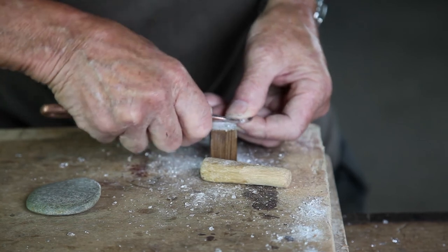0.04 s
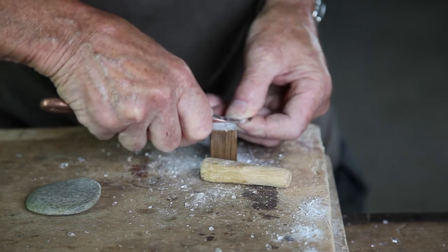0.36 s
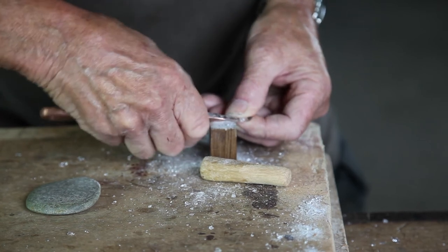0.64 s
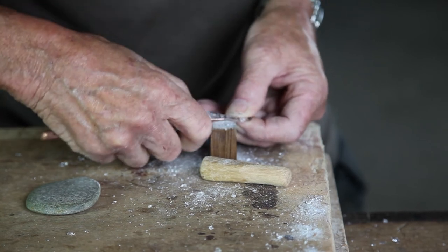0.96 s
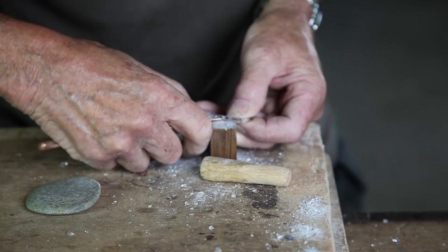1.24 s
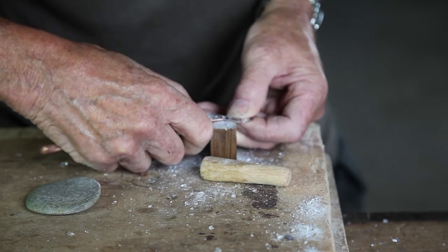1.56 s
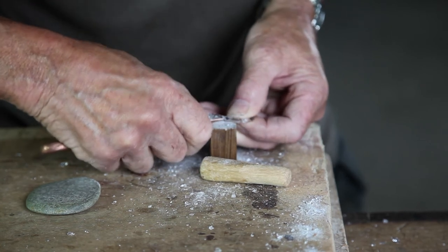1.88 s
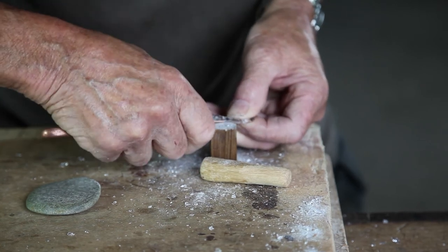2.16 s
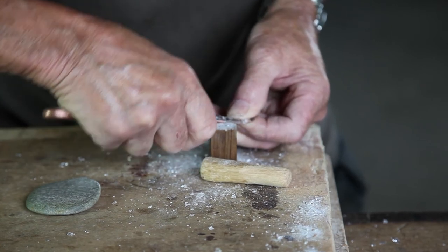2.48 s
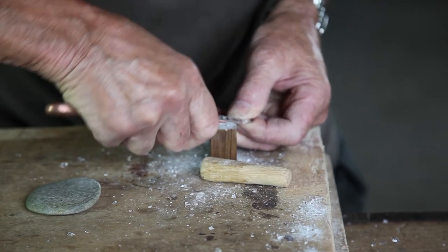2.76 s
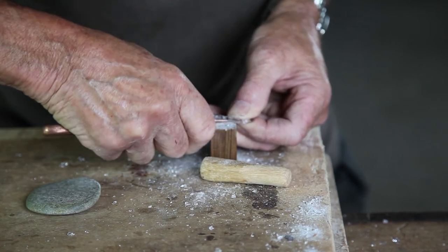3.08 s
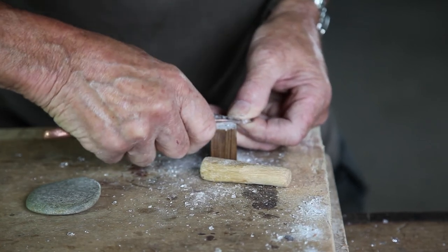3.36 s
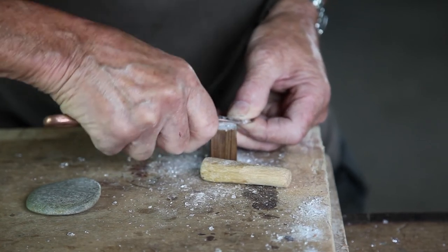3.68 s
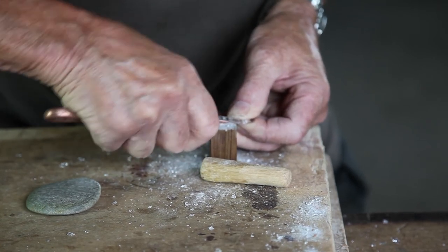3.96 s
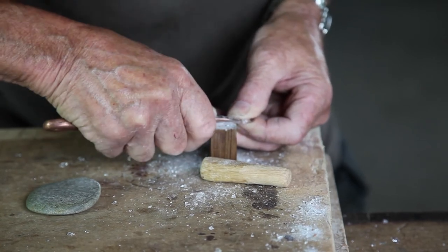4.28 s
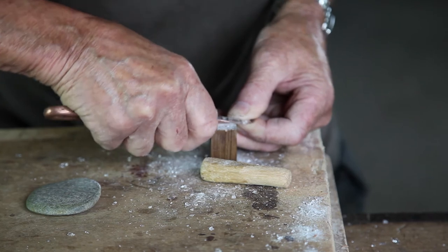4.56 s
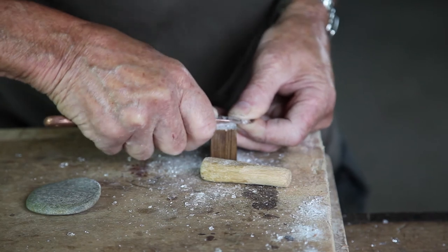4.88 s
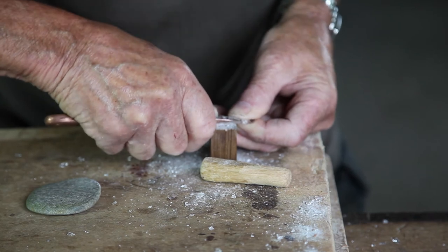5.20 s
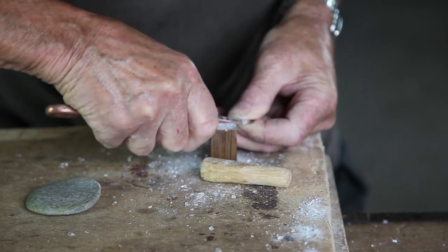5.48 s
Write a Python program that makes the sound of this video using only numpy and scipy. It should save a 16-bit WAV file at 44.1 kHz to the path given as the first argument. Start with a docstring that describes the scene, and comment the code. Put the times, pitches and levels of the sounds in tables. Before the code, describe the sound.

A copper-tipped tool presses flakes off a piece of glass resting on a wooden block. A sharp snap comes first, followed by small chips and ticks, then another loud crack and faint gritty grinding. Four more snaps follow at uneven intervals, the last with a brief, bright metallic ring. The microphone is close, in a bare workshop with a short echo and a low rumble and hiss.

```python
"""A bare workshop: a copper-tipped tool presses flakes off glass that rests on a wooden block on the bench.
The tip grinds and ticks on the edge until a crack runs; glass, tool and block ring and the walls answer.
Small chips barely stir the block; big snaps knock it, and the more freely the tip slips off, the louder
it sings. Crumbs land after each break, over a low rumble and hiss.
A close mid-side microphone hears the work from its side and overloads on the hardest snaps."""
import sys
import numpy as np
from scipy import signal
from scipy.io import wavfile

SR = 44100
rng = np.random.default_rng(int(sys.argv[2]) if len(sys.argv) > 2 else 0)


def to_wav(sig):
    """Store sig (one row per channel, or 1-D mono) as 16-bit WAV at the path in sys.argv[1].

    Samples outside -1..1 are clipped; the rate is SR.
    """
    pcm = np.clip(np.atleast_2d(sig), -1, 1) * 32767
    pcm = np.round(pcm).astype(np.int16)
    wavfile.write(sys.argv[1], SR, pcm.T)  # frames by channels


N = 243873
BLOW_SAMPLES, ATTACK_SAMPLES = int(.25 * SR), int(.012 * SR)


def from_db(db):
    return 10 ** (np.asarray(db) / 20)


def rms_one(x):
    return x / np.sqrt(np.mean(x ** 2) + 1e-20)


def at_hz(curve, hz):
    freqs, values = np.array(curve).T
    return np.interp(np.log(hz), np.log(freqs), values)


def add(out, time_s, sound):
    i = max(int(time_s * SR), 0)
    out[:, i:i + sound.shape[1]] += sound[:, :N - i]


def left_right(mid, side):
    return np.array([mid + side, mid - side])


def noise_bands(size, side_db):
    """Half-octave bands of stereo white noise: yields (centre [Hz], band)."""
    edges_hz = 22 * 2 ** np.arange(0, 9.9, .5)
    white = [left_right(rng.standard_normal(size), from_db(side_db) * rng.standard_normal(size))
             for _ in range(2)]
    for k, (low, high) in enumerate(zip(edges_hz, edges_hz[1:])):
        bandpass = signal.butter(2, [low, high], "band", fs=SR, output="sos")
        yield np.sqrt(low * high), signal.sosfilt(bandpass, rms_one(white[k % 2]))


def resonate(force, modes, spread_db=-1.0):
    """A force through parallel resonances; each contact point gives them new weights and signs."""
    out = 0
    for hz, width, db in modes:
        r = np.exp(-np.pi * width / SR)
        gain = rng.choice([-1, 1]) * from_db(db + spread_db * rng.standard_normal()) * (1 - r * r) / 2
        poles = [1, -2 * r * np.cos(2 * np.pi * hz / SR), r * r]
        out = out + gain * signal.lfilter([1, 0, -1], poles, force)
    return out


def radiate(force, modes, mid_db=-12.0):
    """A part sounds over the range of its modes, in the side lobe: left and right are opposed."""
    span = signal.butter(2, [modes[0][0] * .6, modes[-1][0] * 1.15], "band", fs=SR, output="sos")
    force = signal.sosfilt(span, force + 1e-12 * rng.standard_normal(len(force)))
    return left_right(from_db(mid_db) * resonate(force, modes), resonate(force, modes))


def crack(run_s):
    """The force of a fracture: tiny random jumps that die out."""
    t = np.arange(BLOW_SAMPLES) / SR
    return rng.standard_normal(BLOW_SAMPLES) * np.exp(-(t / run_s) ** 2) + 1e-18


def blow(force, modes, db, mid_db=-15.5):
    """One part set ringing, with the given rms level in its attack."""
    ring = radiate(force, modes, mid_db)
    return from_db(db) * ring / np.sqrt(np.mean(ring[:, :ATTACK_SAMPLES] ** 2) + 1e-20)


# Room tone spectrum: (frequency [Hz], relative density [dB])
AIR = [(25, -4), (45, -0.5), (95, -1), (180, -6), (400, -12), (600, -17), (1000, -20.5), (1900, -24.5),
       (4000, -29.5), (9800, -31), (16000, -35.5)]
def still_air(level_db=-38, side_db=-2.5):
    """The bed: low rumble of the building under an even hiss."""
    bed = sum(from_db(at_hz(AIR, hz)) * band for hz, band in noise_bands(N, side_db))
    return from_db(level_db) * rms_one(bed)


# The voice of each part, low to high: (resonance [Hz], width [Hz], relative level [dB])
BLOCK = [(98, 120, -9.5), (168.5, 5, -1), (320, 108, -7.5), (453, 36, -6), (530.2, 31, 5), (606, 20, 2.5),
         (639, 4.3, 0), (688, 48, -3), (804, 52, -8)]
TOOL = [(926, 135, -10.5), (1052, 59, 1.5), (1233, 270, -9), (1258, 330, -5.5)]
GLASS = [(1664, 102, 3.5), (1762, 137, 1), (2162, 480, -1), (2230, 116, 0), (2350, 68, -2.5),
         (2570, 93, -6), (2770, 78, -25.5)]
EDGE = [(2750, 810, 3.5), (3530, 450, 2), (3750, 270, 3.5), (4070, 1050, 3.5)]
SPLINTER = [(4740, 1100, 0.5), (6210, 800, 6), (6600, 3300, 5), (9000, 5300, 3), (10130, 290, 1.5),
            (12000, 1300, 7.5), (13200, 1600, 0), (15400, 490, 3)]
def tick(body_db, splinter_db):
    """A tiny break under the tip: a knock of block, glass and tool with a splintery top."""
    force = crack(run_s=0.0029)
    body = blow(force, BLOCK, db=0.5) + blow(force, GLASS[:2], db=-1) + blow(force, EDGE, db=-17.5)
    body += blow(force, TOOL, db=0, mid_db=-3.5)
    return from_db(body_db) * body + blow(force, SPLINTER, splinter_db)


# Tick cues: (time [s], body gain [dB], splinter level [dB])
TICKS = [(.051, -64, -35), (.131, -62, -38), (.43, -34.5, -30.5), (.443, -41, -29.5), (.508, -37.5, -39),
         (1.19, -44, -37), (1.512, -43, -51), (1.652, -43, -62), (1.946, -51, -35), (2.022, -53, -37),
         (2.408, -35, -58), (2.419, -60, -35.5), (2.514, -41, -38.5), (2.71, -65, -37), (2.786, -38.5, -47),
         (2.904, -44.5, -43), (3.605, -45.5, -31), (4.152, -41, -52), (4.29, -30.5, -30),
         (4.687, -34.5, -32), (5.059, -46, -62), (5.199, -45.5, -48)]
def ticks():
    """The tip bites or slips on the edge; landing crumbs tick with the same voice."""
    out = np.zeros((2, N))
    for time_s, body_db, splinter_db in TICKS + crumbs():
        add(out, time_s, tick(body_db, splinter_db))
    return out


# Reverb colour: (frequency [Hz], gain [dB])
ROOM_GAIN = [(60, -7), (170, -1), (300, 0), (540, -1), (780, -0.5), (1070, -4.5), (2200, -4.5), (3200, 3.5),
             (4800, -5), (10000, -9.5), (15000, -14)]
# Reverb tail: (frequency [Hz], time to fall 60 dB [s])
ROOM_T60 = [(100, 0.82), (550, 0.71), (1100, 0.66), (2300, 0.63), (4000, 0.6), (8000, 0.43), (15000, 0.43)]
def workshop(sound, predelay_s=0.0053, build_s=0.0042, early_boost_db=-1.0, early_boost_s=0.00057):
    """Bench top and body reflect first; the walls follow from all round and die band by band."""
    t = np.arange(int(.8 * SR)) / SR
    late = np.maximum(t - predelay_s, 0)
    lift = 1 + from_db(early_boost_db) * np.exp(-late / early_boost_s)   # brief, as the reverb starts
    onset = (1 - np.exp(-late / build_s)) * lift
    response = 0
    for hz, band in noise_bands(len(t), side_db=-5.5):
        fade = onset * from_db(-60 * t / at_hz(ROOM_T60, hz))
        response = response + from_db(at_hz(ROOM_GAIN, hz)) * band * fade / np.sqrt(np.sum(fade ** 2))
    side = (sound[:1] - sound[1:]) / 2
    return signal.fftconvolve(side, response, axes=1)[:, :N]


def near_wall(sound, delay_s=.006, echo_db=-5.5, dull_hz=3800):
    """One hard surface close by throws a duller slap into the front of the microphone."""
    side = (sound[0] - sound[1]) / 2
    echo = signal.sosfilt(signal.butter(2, dull_hz, fs=SR, output="sos"), side + 1e-18)
    t = np.arange(N) / SR
    return left_right(from_db(echo_db) * np.interp(t - delay_s, t, echo), 0)


# Strokes of the tip along the edge: (start [s], end [s], gain [dB])
GRINDS = [(.42, .527, -38), (2.31, 2.598, -39.5), (2.56, 2.88, -43.5), (2.86, 3.04, -45.5),
          (3.58, 3.73, -45.5)]
def grinding(grains_per_s=900, uneven_db=3.0, crush_runs=2.2, crush_db=-21):
    """Glass dust crushed under the tip: a gritty swell on each stroke and leading into every break."""
    out = np.zeros((2, N))
    crushes = [(time_s - crush_runs * run_s, time_s + run_s, db + crush_db)
               for time_s, run_s, db, *_ in SNAPS + CHIPS]
    mix_db = [(BLOCK, -8.5), (TOOL, -9), (GLASS, -9.5), (EDGE, -19.5), (SPLINTER, -14.5)]
    for start, end, stroke_db in GRINDS + crushes:
        size = max(int((end - start) * SR), ATTACK_SAMPLES)
        grains = (rng.random(size) < grains_per_s / SR) * rng.choice([-1, 1], size)
        grains = grains * from_db(uneven_db * rng.standard_normal(size))
        force = np.pad(grains * signal.windows.tukey(size, .5), (0, ATTACK_SAMPLES)) + 1e-18
        grit = sum(from_db(db) * rms_one(radiate(force, part)) for part, db in mix_db)
        add(out, start, from_db(stroke_db) * grit)
    return out


def tilted(modes, db_per_octave):
    """The same modes, voiced brighter or darker."""
    return [(hz, width, db + db_per_octave * np.log2(hz / modes[0][0])) for hz, width, db in modes]


def fracture(run_s, glass_db, block_db, tool_db, edge_db, splinter_db, glass_tilt, block_tilt=0):
    """One fracture shakes all parts at once; where it starts decides which modes speak."""
    force = crack(run_s)
    block = blow(force, tilted(BLOCK, block_tilt), block_db)
    glass = blow(force, tilted(GLASS, glass_tilt), glass_db)
    shaft = blow(force, TOOL, tool_db, mid_db=-5.5)   # the long tool reaches into the front lobe
    splinters = blow(crack(run_s), SPLINTER, splinter_db)   # they fly as the crack opens
    edge = blow(force, EDGE, edge_db + 0.17 * glass_tilt)   # brighter glass, more of its thin edge
    return block + glass + shaft + splinters + edge


# Balance of a snap, by part: (offset from the strength [dB], gain with slip [dB/dB])
SNAP_PARTS = {"block": (-6, -.05), "tool": (-4.5, 0.25), "edge": (-15.5, 0.028), "splinter": (-0.35, 0.44),
              "tip": (-1.3, 1.03), "bench": (5, .85)}
def part_db(part, strength_db, slip_db):
    """A freer slip takes more of the blow into the tool, the splinters and the bench."""
    offset_db, per_slip = SNAP_PARTS[part]
    return strength_db + offset_db + per_slip * slip_db


# The big hits: (time [s], crack run [s], strength [dB], freedom of the slip [dB],
# glass tilt [dB/octave], block tilt [dB/octave], reverb send [dB])
SNAPS = [(0.274, 0.0045, -10, -25, 1, 0.5, 6.5), (2.1174, 0.0075, -8.5, -28, 0.5, 0.5, -1),
         (3.7363, .007, -8.5, -26, -11, -0.5, 1), (4.2576, 0.0051, -19.5, -4, 12, -2, -3),
         (4.549, 0.005, -9, -7.5, 0.5, -1, 2), (5.437, 0.005, -14.5, 5, 8, -3, 4.5)]
def snaps(to_walls=False):
    """A flake snaps off and the tool follows through, knocking the block."""
    out = np.zeros((2, N))
    for time_s, run_s, db, slip_db, glass_tilt, block_tilt, send_db in SNAPS:
        levels_db = [part_db(part, db, slip_db) for part in ("block", "tool", "edge", "splinter")]
        snap = fracture(run_s, db, *levels_db, glass_tilt, block_tilt)
        add(out, time_s, from_db(send_db if to_walls else 0) * snap)
    return out


# Long ring of the tip: (frequency [Hz], relative level [dB], time to fall 60 dB [s])
TIP = [(1084, -2.5, 0.21), (1662, -8, 0.2), (2180, -12, 0.45), (3000, -24, 0.42), (4050, -14.5, 0.37),
       (5190, -10, 0.12), (6500, -21, 0.25), (7400, -14, 0.35), (10000, -11.5, 0.38), (11400, -8, 0.097),
       (13890, -22, 0.2), (15000, -11, 0.2)]
def free_tip(mid_db=-1.0, split=0.0094, count=4):
    """No longer damped by the glass, the tip sings; the grip splits each mode into a beating cluster."""
    out, t = np.zeros((2, N)), np.arange(SR // 2) / SR
    for time_s, _, strength_db, slip_db, *_ in SNAPS:
        level_db = part_db("tip", strength_db, slip_db)
        for hz, db, t60 in TIP:
            cluster_hz = hz * (1 + split * rng.standard_normal((count, 1)))
            partials = np.sin(2 * np.pi * (cluster_hz * t + rng.random((2, count, 1))))
            mid, side = partials.sum(axis=1) * from_db(level_db + db - 60 * t / t60) / np.sqrt(2 * count)
            add(out, time_s, left_right(from_db(mid_db) * mid, side))
    return out


def bench_sway(sway_hz=34.0, t60=0.12):
    """Sub thump of a snap: a quickly damped swing of the bench under the microphone."""
    out, t = np.zeros((2, N)), np.arange(BLOW_SAMPLES) / SR
    for time_s, _, strength_db, slip_db, *_ in SNAPS:
        fade = from_db(part_db("bench", strength_db, slip_db) - 60 * t / t60)
        add(out, time_s, left_right(0, np.sin(2 * np.pi * sway_hz * t) * fade))
    return out


def overload_clicks(after_runs=0.79, click_db=-17.5, click_hz=14400, width_hz=3200):
    """A very short, bright click of overload tops each snap."""
    out = np.zeros((2, N))
    for time_s, run_s, db, *_ in SNAPS:
        click = blow(crack(run_s=0.002), [(click_hz, width_hz, 0)], db + click_db, mid_db=0)
        add(out, time_s + after_runs * run_s, click)
    return out


def crumbs(count=3, within_s=0.35, typical_db=-52.5, spread_db=5.5, body_db=-2):
    """Each break sheds a few crumbs that land at random: returns extra tick cues."""
    cues = []
    for time_s, *_ in SNAPS + CHIPS:
        for fall, size in zip(rng.random(count), rng.standard_normal(count)):
            db = typical_db + spread_db * size
            cues.append((time_s + within_s * fall, db + body_db, db))
    return [cue for cue in cues if cue[0] < N / SR]


# The small hits: (time [s], crack run [s], strength [dB], tool offset [dB], glass tilt [dB/octave])
CHIPS = [(.636, .005, -32, -18, -16), (0.9624, 0.012, -28.5, -0.5, -34), (1.1309, 0.0081, -22, -1, 6),
         (1.402, 0.0037, -29.5, -8, -29), (1.881, .01, -21.5, -19, -12), (1.9133, 0.0023, -23, -18, 13)]
def chips():
    """A small chip breaks while the tip holds: glass and tool ring, the block barely stirs."""
    out = np.zeros((2, N))
    for time_s, run_s, db, tool_db, tilt in CHIPS:
        chip = fracture(run_s, glass_db=0, block_db=-16, tool_db=tool_db,
                        edge_db=-4.5, splinter_db=-0.5, glass_tilt=tilt)
        add(out, time_s, from_db(db) * chip)
    return out


def scene(chip_send_db=-2, tip_send_db=-9.0, break_return_db=-1.5, directions=3):
    """The close work, its reverb and the room tone; each direction gets its own mix of a break's modes."""
    breaks, detail, tip = snaps() + chips(), ticks() + grinding(), free_tip()
    walls = sum(workshop(snaps(to_walls=True) + from_db(chip_send_db) * chips())
                for _ in range(directions))
    room = from_db(break_return_db) * walls / np.sqrt(directions)
    room += workshop(detail + from_db(tip_send_db) * tip)
    close = breaks + overload_clicks() + detail + tip + bench_sway()
    return close + near_wall(breaks + detail) + room + still_air()


def record(dry, ceiling=0.75, cutoff_hz=15900):
    """A soft clip flattens the hardest peaks; a steep low-pass cuts the top."""
    clipped = dry / (1 + (dry / ceiling) ** 6) ** (1 / 6)
    return signal.sosfilt(signal.ellip(10, .2, 70, cutoff_hz, fs=SR, output="sos"), clipped)


dry = scene()
out = record(dry)
to_wav(out)
```